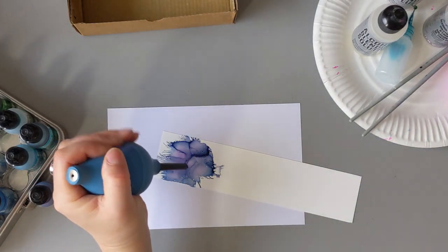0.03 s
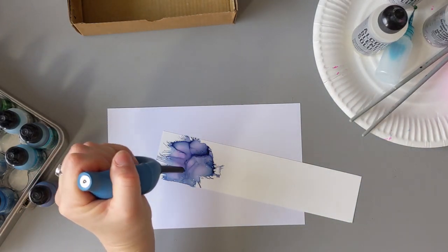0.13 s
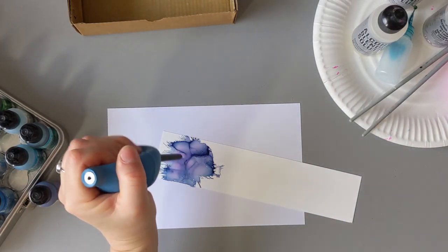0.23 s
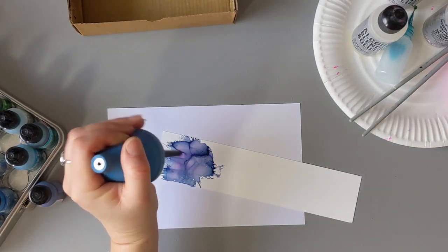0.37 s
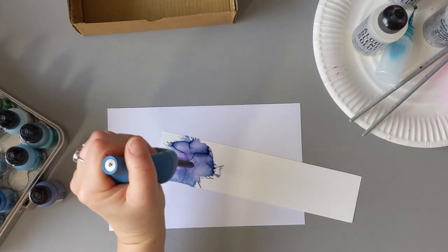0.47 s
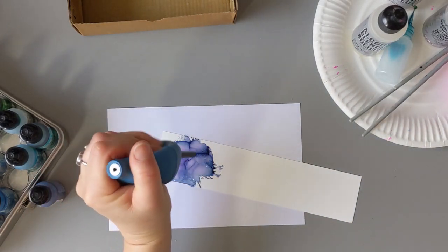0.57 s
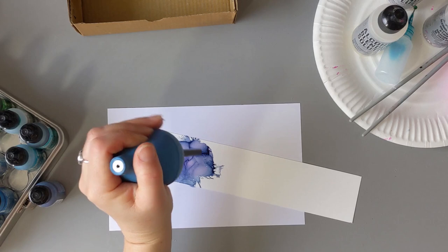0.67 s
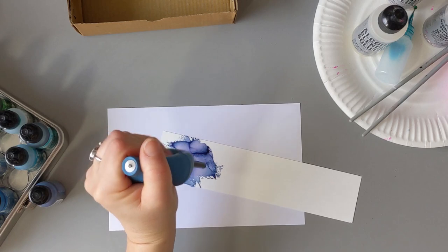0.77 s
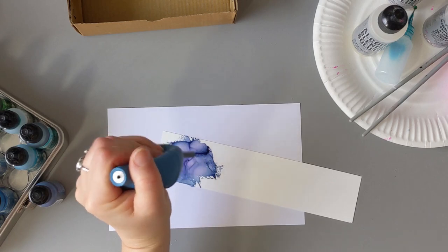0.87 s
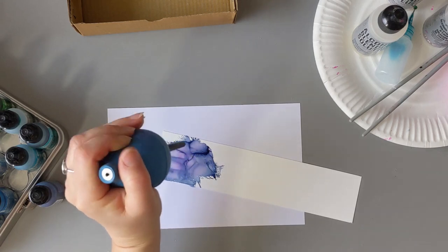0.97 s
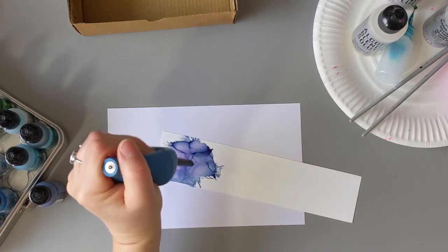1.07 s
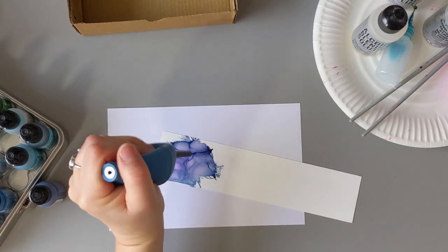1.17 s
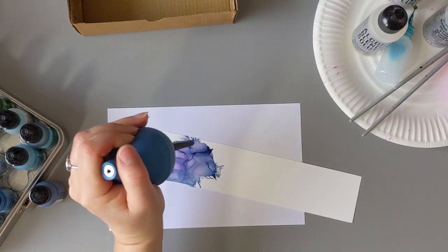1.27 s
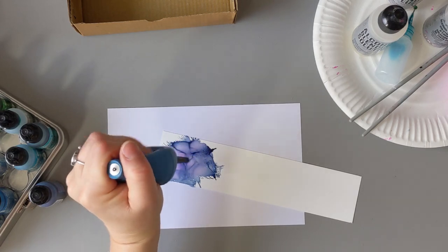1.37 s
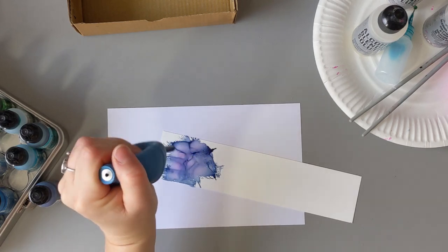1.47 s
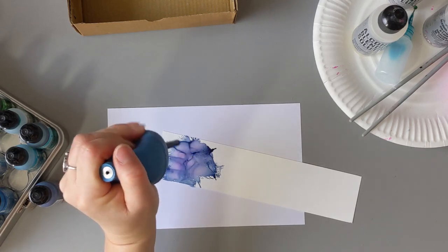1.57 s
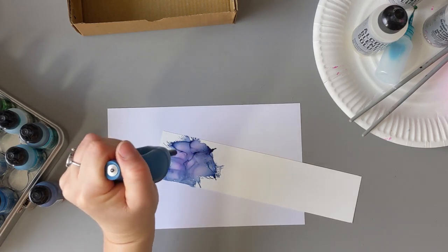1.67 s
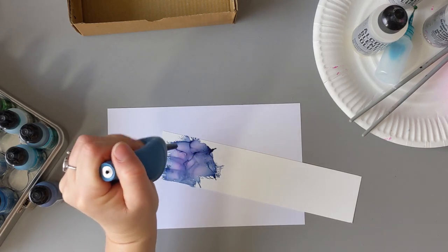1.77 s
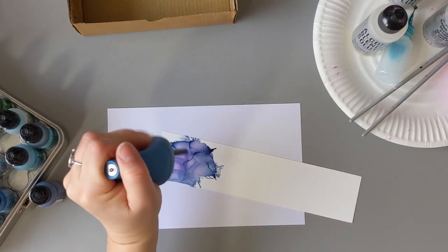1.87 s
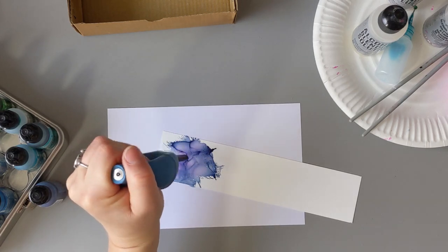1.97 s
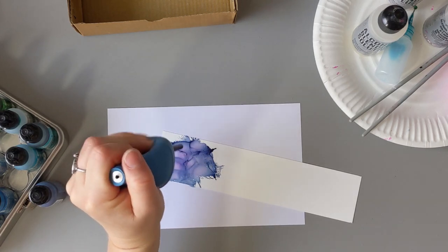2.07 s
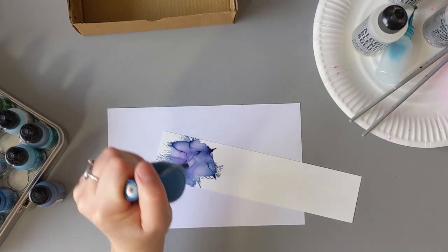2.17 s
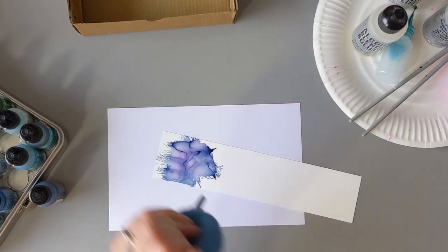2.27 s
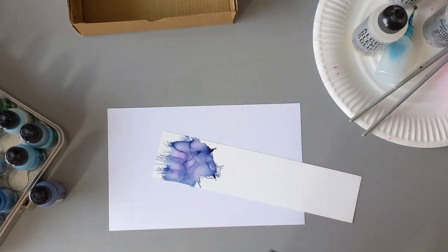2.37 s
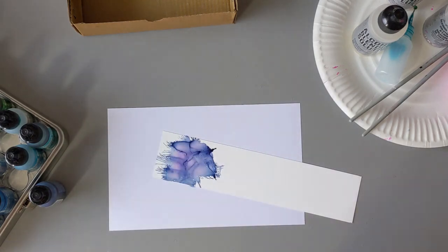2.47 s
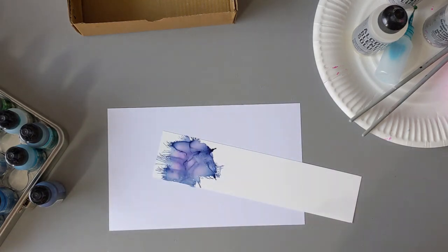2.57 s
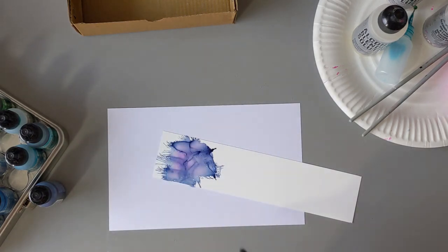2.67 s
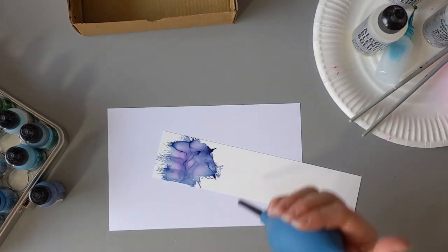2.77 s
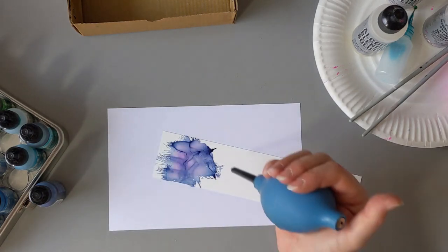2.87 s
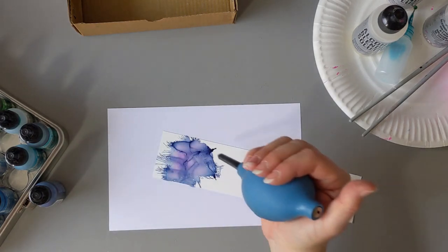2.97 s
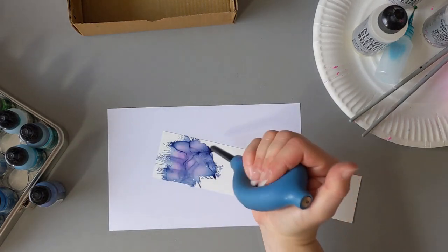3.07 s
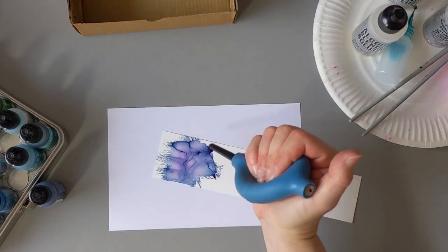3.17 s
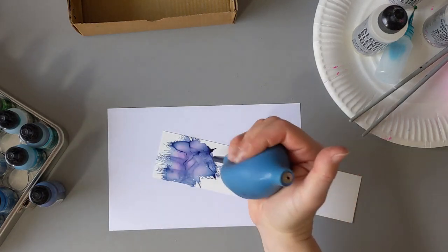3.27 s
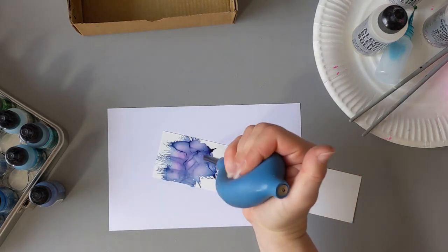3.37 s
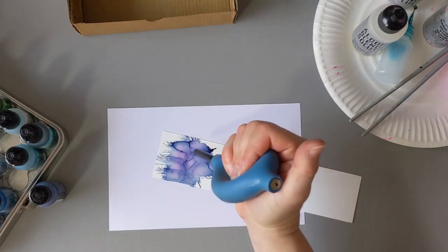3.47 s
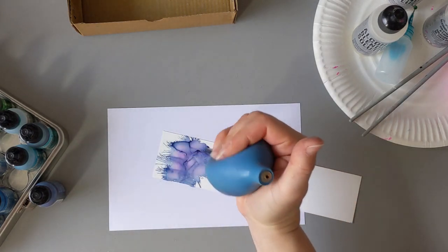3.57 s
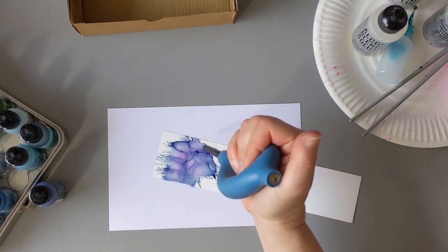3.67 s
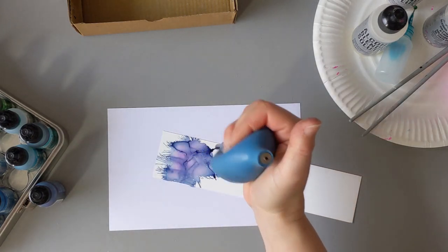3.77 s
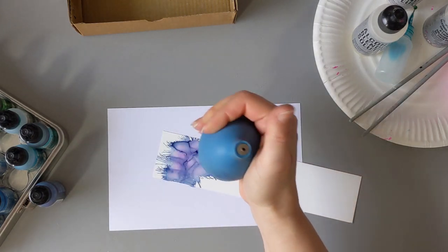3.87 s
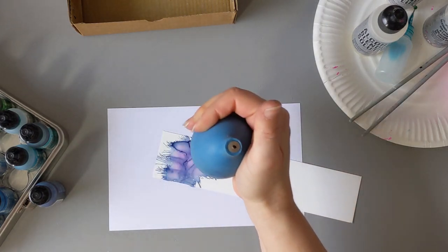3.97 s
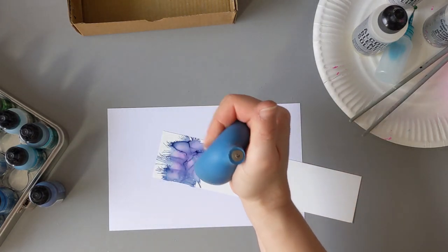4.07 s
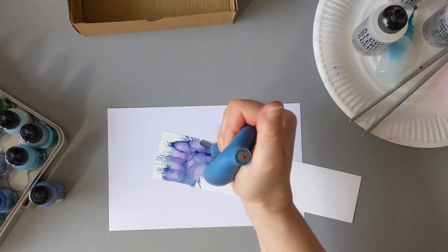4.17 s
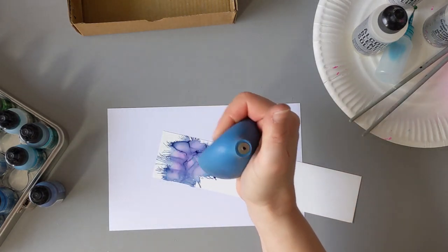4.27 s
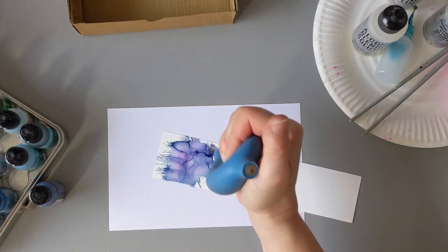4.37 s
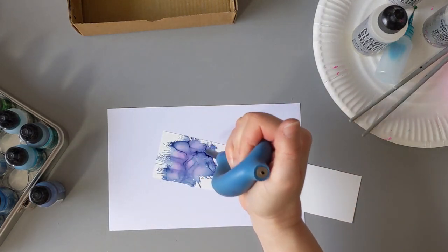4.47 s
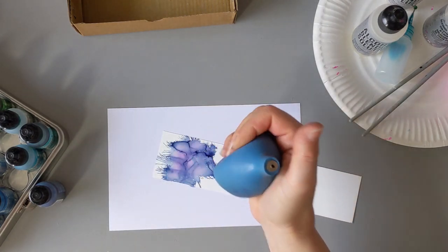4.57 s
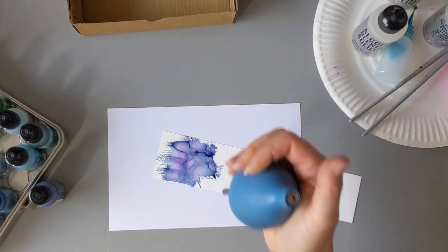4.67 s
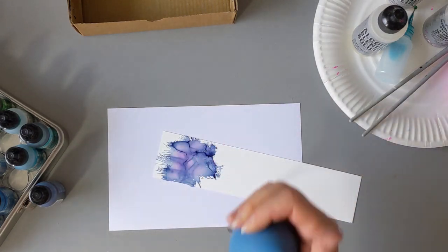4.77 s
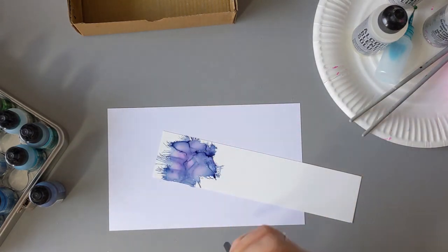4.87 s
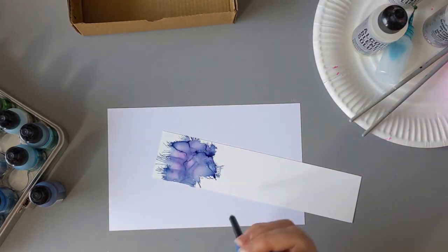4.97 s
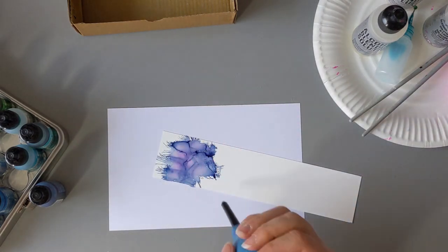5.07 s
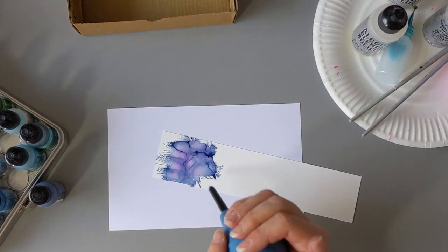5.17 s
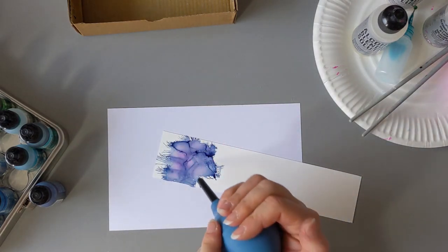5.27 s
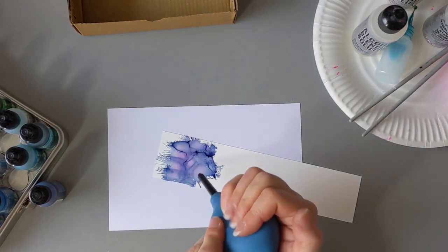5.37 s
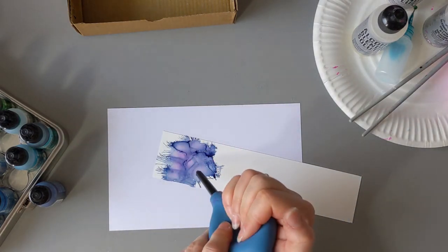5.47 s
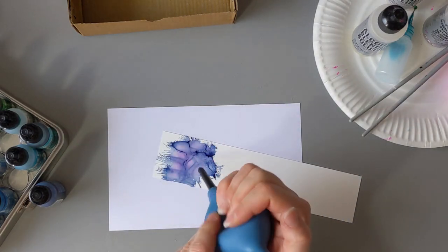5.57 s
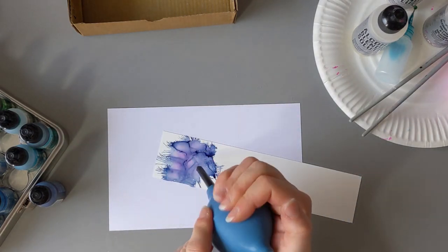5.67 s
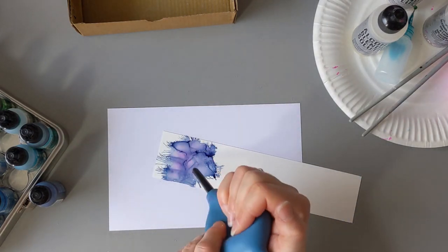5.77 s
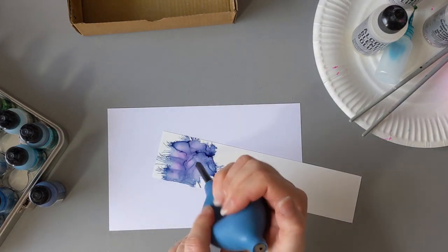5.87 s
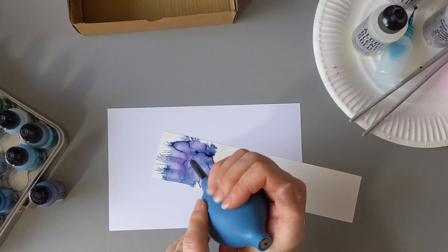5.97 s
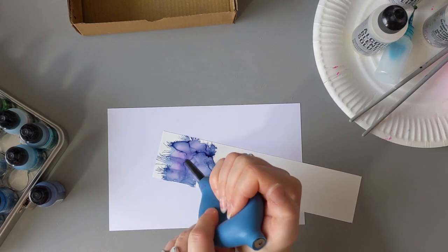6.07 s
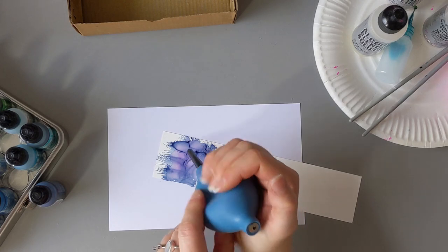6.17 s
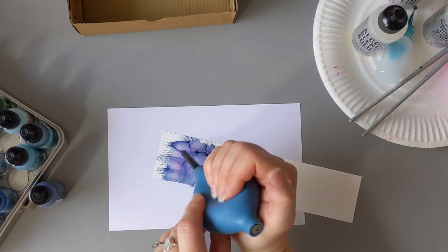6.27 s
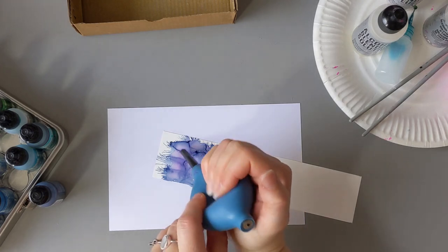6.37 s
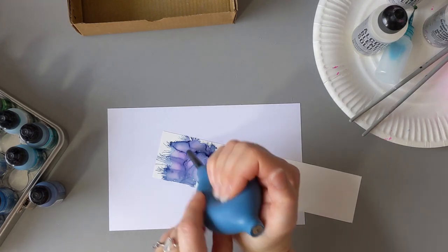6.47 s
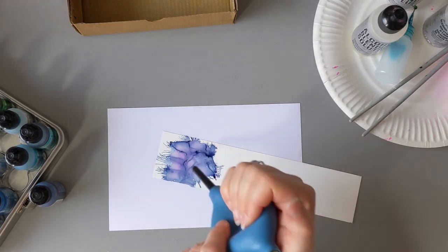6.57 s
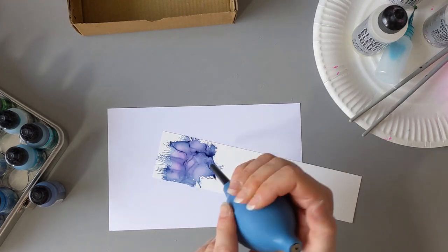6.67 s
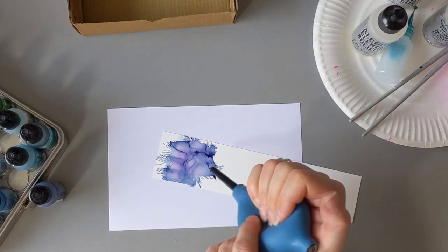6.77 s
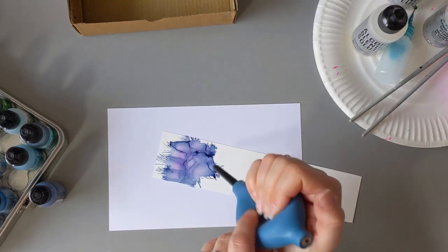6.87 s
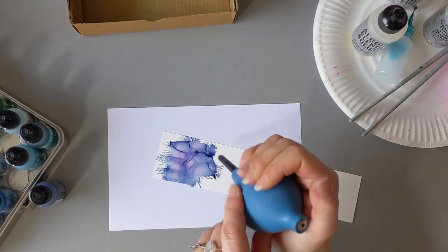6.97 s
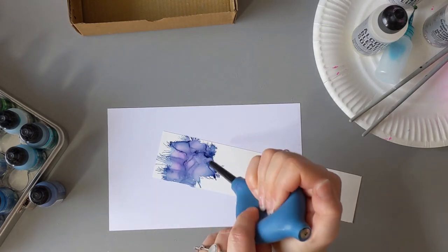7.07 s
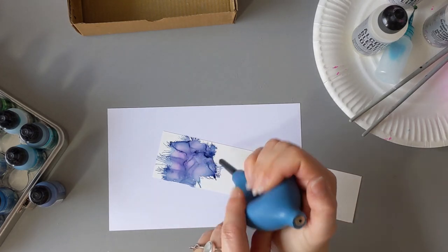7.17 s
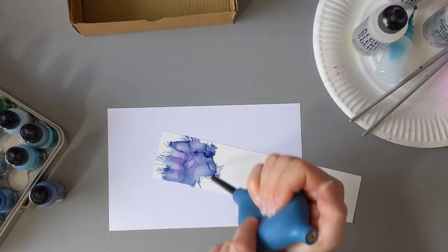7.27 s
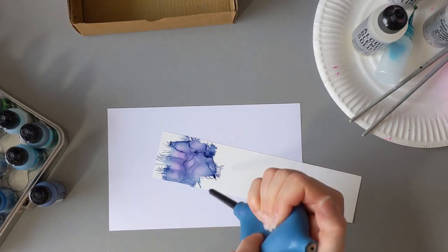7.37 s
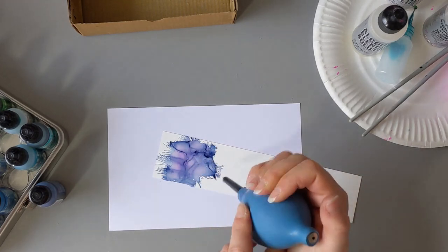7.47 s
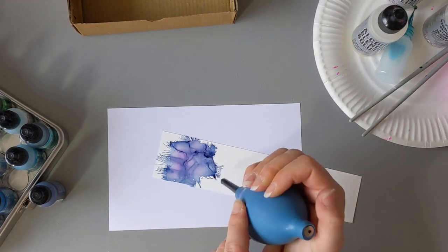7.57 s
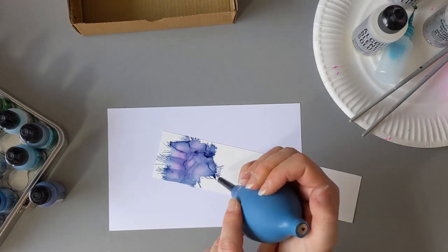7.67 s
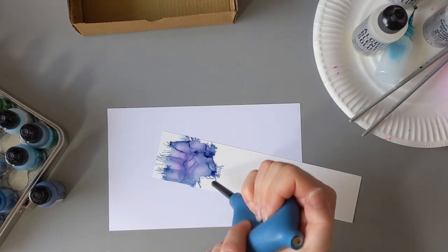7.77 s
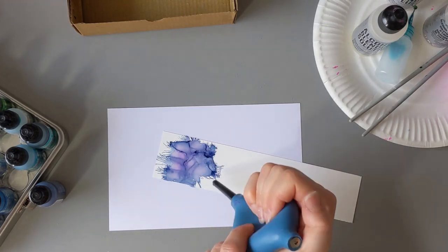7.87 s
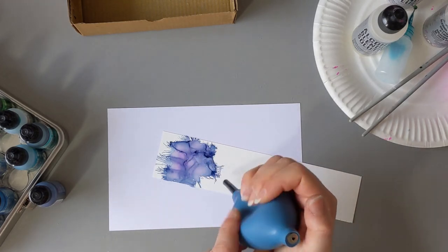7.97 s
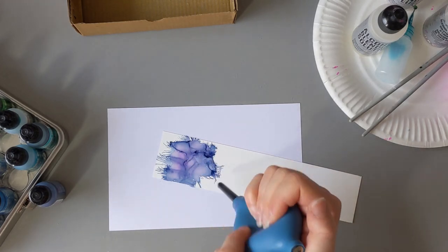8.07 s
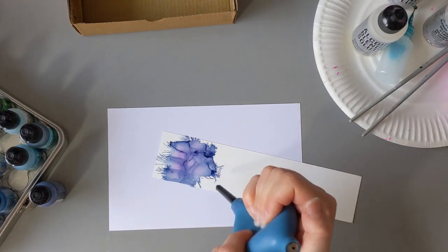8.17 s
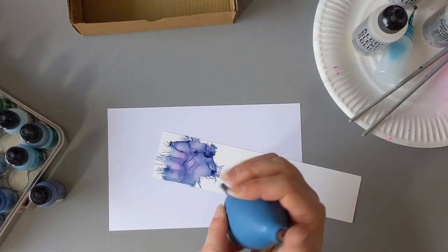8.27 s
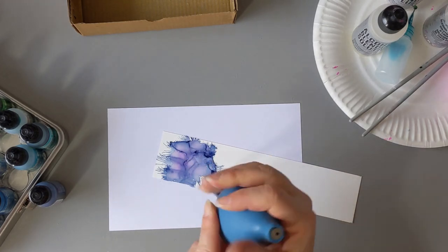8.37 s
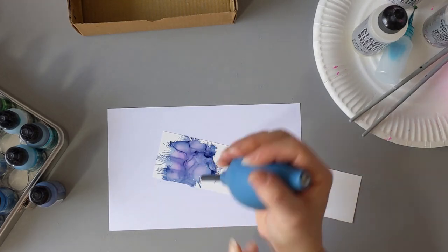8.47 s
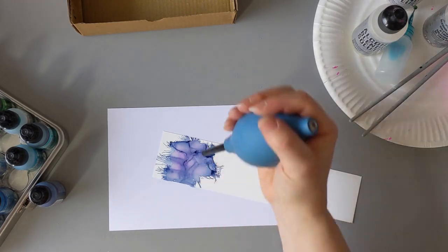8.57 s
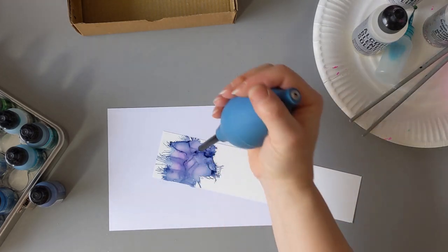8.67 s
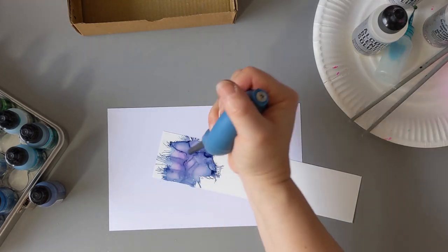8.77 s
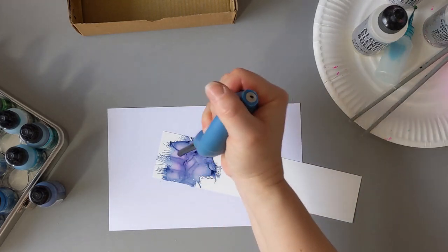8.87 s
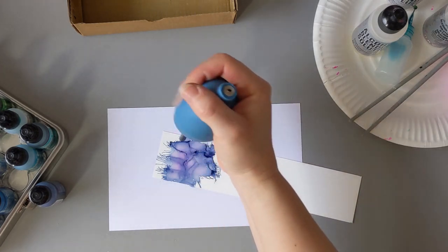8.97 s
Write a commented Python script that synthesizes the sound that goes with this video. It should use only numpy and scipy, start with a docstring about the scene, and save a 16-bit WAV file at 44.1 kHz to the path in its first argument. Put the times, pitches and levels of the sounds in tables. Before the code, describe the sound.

A hand-squeezed rubber blower puffs short, bright bursts of air over paper, about three per second. Between puffs a small valve ticks and air hisses back in. After nine puffs there is a pause with faint skin rubs and a light knock, then more puffs in uneven groups, many ending in a hollow thump. Close stereo microphone, small quiet room with low rumble.

```python
"""Short puffs of air hiss from a rubber bulb blower, first from the left hand, then from the right.
It blows over wet ink on a craft table: each squeeze pushes noisy, swirling air out of the nozzle.
On release the inlet valve ticks open, as a few short ringing tones, and air hisses back in.
Hard squeezes bottom out with a hollow thump, and skin brushes the rubber now and then.
The room is small and quiet: a soft tail of reflections over low rumble and faint hiss."""
import sys
import numpy as np
from scipy import signal
from scipy.fft import rfft, irfft
from scipy.io import wavfile
from scipy.ndimage import uniform_filter1d

SR = 44100
rng = np.random.default_rng(int(sys.argv[2]) if len(sys.argv) > 2 else 0)


def generate_wav(sig):
    """Save sig (samples, or channels by samples) to the path in sys.argv[1] as 16-bit PCM at SR."""
    pcm = np.round(np.clip(np.atleast_2d(sig).T, -1, 1) * 32767).astype(np.int16)
    wavfile.write(sys.argv[1], SR, pcm)


N = 397333  # length in samples

# Settings in pairs are for (left hand, right hand). Levels in tables are starting levels, before the mix.
HAND_CHANGE_S = 2.8
EDGE_HZ = 15900  # upper limit of the sound
USUAL_DB = -40  # starting level of a usual puff or gulp
# how much later the hiss reaches the right channel than the left
LAG_S = (0.000094, 0.00003)

# the hand closes on the bulb: (t/s, length/s, level/dB, swell over the stroke/dB)
SQUEEZES = [(-.061, .08, -43.5, 6), (0.291, 0.13, -46.5, 5), (0.622, 0.13, -44, -0.5),
            (0.929, 0.13, -43, 1), (1.24, 0.12, -41, 0.5), (1.546, 0.097, -39.5, 1),
            (1.823, 0.095, -39.5, 6), (2.097, 0.081, -39.3, 5), (2.33, 0.12, -38.5, -2),
            (3.273, 0.12, -42, 1.5), (3.573, 0.086, -42, -2.5), (3.806, 0.13, -42.5, -3.5),
            (4.298, 0.11, -44.5, -3), (4.556, 0.14, -41, 2.5), (5.612, 0.11, -42, 6.5),
            (5.902, .11, -42.5, 8.5), (6.195, 0.099, -42.5, 2), (6.444, 0.083, -43.5, 6.5),
            (6.667, .1, -40.5, 9), (6.945, .099, -38.5, 9), (7.207, 0.097, -37.5, 5),
            (7.451, .115, -41, 12.5), (7.969, 0.12, -41.5, 8), (8.253, 0.11, -40, 10),
            (8.947, 0.082, -45.5, 9)]
# colour of air leaving the nozzle and striking the paper: (f/Hz, left level/dB, right level/dB)
JET_LEFT_HAND = [(200, -22, -17.5), (816, -13.5, -15), (1510, -22, -21), (1930, -15, -14.5),
                 (2700, -12, -8), (3640, -17.5, -18.5), (5400, -11.5, -9.5), (6300, -4.5, -13.5),
                 (6400, -10.5, -9.5), (8300, -7.5, -13.5), (9900, -14, -6), (10400, -7.5, -7.5),
                 (13100, -13, -4.5), (16400, -15, -8)]
JET_RIGHT_HAND = [(200, -28.5, -28.5), (760, -23, -24), (1680, -27, -28), (2040, -18.5, -19.5),
                  (3120, -14.5, -15.5), (3880, -18.5, -20), (5870, -12.5, -13.5), (5830, -8.5, -14),
                  (7500, -11, -12), (8460, -12, -15.5), (10260, -10.5, -7.5), (11500, -11.5, -9),
                  (13800, -22, -2.5), (14800, -10.5, -5.5)]
LEVEL_AT = 0.65  # share of the stroke at which the swell passes through 0 dB
BUILD_S, RELEASE_S = (0.12, 0.067), (0.0084, 0.0061)  # pressure builds, then collapses
JET_PAN_DB = (1, -0.2)  # extra left minus right level
JET_TILT_DB = (4, 0.84)  # extra brightness per octave at the usual level
JET_BRIGHTENING = 0.29  # faster air is brighter: dB per octave for each dB of level


def nozzle():
    """Pressure builds as the hand closes, and collapses when it stops; harder squeezes are brighter."""
    out = np.zeros((2, N))
    t = np.arange(SR // 4) / SR
    for s, length, db, swell_db in SQUEEZES:
        grip = hand(s)
        build = np.sin(np.pi / 2 * np.clip(t / BUILD_S[grip], 0, 1))
        swell = amp(swell_db * (np.minimum(t / length, 1) - LEVEL_AT))
        collapse = np.exp(-np.maximum(t - length, 0) / RELEASE_S[grip])
        flow = build * swell * collapse
        colour = JET_RIGHT_HAND if grip else JET_LEFT_HAND
        tilt_db = JET_TILT_DB[grip] + JET_BRIGHTENING * (db - USUAL_DB)
        puff = rush(flow, colour, LAG_S[grip], tilt_db, JET_PAN_DB[grip],
                    echo=1.0, sharpening=0.32, flutter_db=0.85)
        add(out, s, amp(db) * puff)
    return out


# the valve lifts and the bulb springs back: (t/s, time to full flow/s, hiss level/dB, tick level/dB)
REFILLS = [(.156, .05, -44.5, -49.5), (.492, 0.056, -42, -51), (.795, 0.057, -41, -51),
           (1.109, 0.053, -39.5, -49.5), (1.41, 0.051, -38, -47.5), (1.686, 0.044, -41, -49.5),
           (1.965, 0.045, -41, -49), (2.21, 0.028, -43, -47), (3.116, 0.076, -40.5, -51),
           (3.434, 0.061, -47, -46.5), (3.69, 0.049, -46.5, -48), (4.141, 0.067, -36.5, -46.5),
           (4.428, 0.052, -39, -44), (5.462, 0.048, -48.5, -56), (5.784, 0.045, -45.5, -49.5),
           (6.081, 0.034, -44, -47.5), (6.334, 0.04, -47.5, -45), (6.551, 0.035, -44, -44),
           (6.815, 0.049, -44, -44.5), (7.085, 0.043, -39, -46), (7.328, 0.04, -35.5, -49),
           (7.816, 0.053, -37.5, -43.5), (8.119, 0.047, -38, -45.5), (8.8, 0.068, -37.5, -48.5)]
# colour of air drawn through the inlet valve: (f/Hz, left level/dB, right level/dB)
INLET_LEFT_HAND = [(200, -17, -11.5), (900, -27, -23.5), (1470, -20.5, -18.5), (2520, -12.5, -8.5),
                   (4370, -5.5, -2), (6060, -8, -6.5), (7600, -11.5, -11), (9850, -5.5, -3),
                   (11600, -6, 2.5), (13900, -17, 1.5), (15900, -2, -2)]
INLET_RIGHT_HAND = [(198, -17, -13), (900, -19.5, -14.5), (1450, -13, -10.5), (2580, -7.5, -3),
                    (4550, -5.5, -2), (6250, -6.5, -4.5), (7550, -9.5, -8.5), (9200, -2.5, -1),
                    (11500, -6, 3), (13600, -6, 3), (16300, -17, 0.5)]
INLET_PAN_DB = (3, 5)  # extra left minus right level
INLET_TILT_DB = (1.76, 2.5)  # extra brightness per octave at the usual level
INLET_BRIGHTENING = 0.33  # dB per octave for each dB of level
LEAK_S = 0.005  # air seeps in this long before the flap lifts
REFILL_FADE_S = 0.019  # at the usual level
SLOWING = 0.087  # a weaker gulp dies away more slowly: dB of fade time for each dB of level


def inlet():
    """The rubber springs back and draws one smooth gulp of air; stronger gulps are brighter."""
    out = np.zeros((2, N))
    t = np.arange(SR // 4) / SR
    for s, to_full, db, _ in REFILLS:
        grip = hand(s)
        rise = LEAK_S + to_full
        fade = REFILL_FADE_S * amp(SLOWING * (USUAL_DB - db))
        width = np.where(t < rise, rise / 2, fade)
        gulp = np.exp(-0.5 * ((t - rise) / width) ** 2)
        flow = gulp * np.minimum(t / 0.00083, 1)  # starts from silence
        colour = INLET_RIGHT_HAND if grip else INLET_LEFT_HAND
        tilt_db = INLET_TILT_DB[grip] + INLET_BRIGHTENING * (db - USUAL_DB)
        hiss = rush(flow, colour, LAG_S[grip], tilt_db, INLET_PAN_DB[grip],
                    echo=0.77, sharpening=0.43, flutter_db=0.9)
        add(out, s - LEAK_S, amp(db) * hiss)
    return out


# how alike moving air sounds in both channels: (f/Hz, left-right likeness 0 to 1)
AIR_LIKENESS = [(200, 1), (1400, 0.5), (4000, 0.36), (15000, 0.099)]


def rush(flow, colour, lag, tilt_db, pan_db, echo, sharpening, flutter_db):
    """Turbulent air through a small opening; its top end grows faster with flow than its body."""
    size = len(flow)
    hz = np.fft.rfftfreq(size, 1 / SR)
    slope_db = tilt_db * np.log2(np.maximum(hz, 2000) / 8000)  # level below 2 kHz stays flat
    late_right = np.exp(-2j * np.pi * hz * np.array([[0], [lag]]))
    gain = amp(read(colour, hz) + slope_db) * late_right
    spectrum = rfft(noise(gain, AIR_LIKENESS, size))
    # the bulb changes shape as air passes, so one pattern of echoes gives way to another
    early, late = (evened(irfft(spectrum * near_echoes(hz, echo), size)) for _ in range(2))
    moved = np.cumsum(flow) / flow.sum()  # share of the air that has passed
    air = early * (1 - moved) + late * moved
    top = irfft(rfft(air) / (1 + (9500 / (hz + 1)) ** 6), size)
    body = air - top
    sharpening = np.clip(sharpening, 0, 0.8)
    sound = body * flow ** (1 - sharpening) + top * flow ** (1 + sharpening / 2)
    eddies = evened(uniform_filter1d(rng.standard_normal(size), size=130))
    return sound * amp(flutter_db * eddies) * amp([[pan_db / 2], [-pan_db / 2]])


def near_echoes(hz, strength, count=6):
    """Hand, bulb and table reflect the hiss a moment later; the delays are drawn anew each time."""
    delay = rng.uniform(0.000334, 0.005, (count, 1))
    delay = delay + 0.000015 * rng.standard_normal((2, count, 1))  # slightly different left and right
    sign = rng.choice([-1, 1], (count, 1))
    echoes = (sign * np.exp(-2j * np.pi * hz * delay)).sum(1)
    return 1 + strength * echoes / np.sqrt(count)


# ringing of the flap and its housing: (f/Hz before the pitch ratio, level/dB, time to fall 60 dB/s)
VALVE_MODES = [(322, 0.5, 0.017), (937, -1.5, 0.015), (1244, -1.5, 0.012), (3130, -11.5, 0.011),
               (7630, 2.5, 0.0071)]
FLAP_PITCH = (0.933, 1.0)  # pitch ratio of the lifting flap
FLAP_SPREAD = 0.2  # each opening tick strays from that pitch by up to this share
SHUT_DB, SHUT_DELAY_S = (-70.5, -64), 0.009  # starting level; wait from squeeze to flap seating


def valve():
    """Suction tugs the flap open with a tick; pressure seats it again, tauter and usually higher."""
    out = np.zeros((2, N))
    for s, _, _, db in REFILLS:
        pitch = FLAP_PITCH[hand(s)] * (1 + FLAP_SPREAD * rng.uniform(-1, 1))
        add(out, s, amp(db + 6.5) * ring(VALVE_MODES, attack=0.0011, pitch=pitch))
        add(out, s, amp(db - 20.0) * spit(decay=0.0071))
        add(out, s, amp(db + 2) * spit(decay=0.0003))  # the flap unsticks with a needle-sharp crack
        add(out, s - 0.004, amp(db + 2.5) * push(width=0.00251))
    for start, *_ in SQUEEZES:
        s = start + SHUT_DELAY_S
        db = SHUT_DB[hand(start)]
        pitch = 1.31 * rng.uniform(0.695, 0.98)
        add(out, s, amp(db + 8.0) * ring(VALVE_MODES, attack=0.0001, pitch=pitch))
        add(out, s, amp(db + 4) * spit(decay=0.011))
    return out


def spit(decay):
    """A tiny burst of air slips past the moving flap."""
    t = np.arange(SR // 25) / SR
    colour = amp(read(INLET_RIGHT_HAND, np.fft.rfftfreq(len(t), 1 / SR)))
    return noise(colour, AIR_LIKENESS, len(t)) * np.exp(-t / decay)


# a hard squeeze bottoms out: (t/s, hollow ring level/dB, dull push level/dB)
THUMPS = [(.009, -58, -66), (3.932, -79, -55), (4.688, -53, -48.5), (5.706, -50.5, -49),
          (6.003, -35.5, -49), (6.292, -26, -64), (6.537, -58, -60), (6.762, -34, -51), (7.039, -36.5, -50),
          (7.301, -41, -54), (7.56, -36, -57), (8.08, -48.5, -50), (8.349, -58, -50.5)]
# air in the bulb and its rubber wall: (f/Hz before the pitch ratio, level/dB, time to fall 60 dB/s)
BULB_MODES = [(528, 5.5, 0.036), (340, 6, 0.0036), (338, -13.5, 0.11), (560, -29, 0.13)]
# fingers knock the bulb as it changes hands: (t/s, level/dB)
KNOCKS = [(2.561, -53.5)]
# ringing of the knocked bulb: (f/Hz, level/dB, time to fall 60 dB/s)
KNOCK_MODES = [(497, 1.5, 0.077), (539, -10, 0.32), (907, -5, 0.061)]
# the rubber wall flops back into shape: starting level, and start as a multiple of time to full flow
FLOP_DB, FLOP_AFTER = (-59, -49.5), 1.5


def bulb():
    """The walls meet after a hard squeeze and the hollow rings; flops and a knock come in between."""
    out = np.zeros((2, N))
    for s, ring_db, push_db in THUMPS:
        hollow = ring(BULB_MODES, attack=0.0014, pitch=rng.uniform(1.0, 1.03), slack=0.0015)
        add(out, s - 0.002, -amp(ring_db + 3.5) * hollow)
        add(out, s - 0.001, amp(push_db + 13) * push(width=0.0019))
        add(out, s - 0.005, amp(push_db + 5) * push(width=0.0051))
    for s, to_full, *_ in REFILLS:  # no ring: the hollow is open again
        add(out, s + FLOP_AFTER * to_full, amp(FLOP_DB[hand(s)]) * push(width=0.00073))
    for s, db in KNOCKS:
        add(out, s, amp(db) * ring(KNOCK_MODES, attack=0.001))
    return out


def ring(modes, attack, pitch=1, slack=0):
    """Fading tones after a soft blow; slack rubber starts low and tightens within milliseconds."""
    t = np.arange(SR // 5) / SR
    bent_time = pitch * (t - slack * (1 - np.exp(-t / 0.0016)))
    tones = sum(amp(db - 60 * t / t60) * np.sin(2 * np.pi * hz * bent_time) for hz, db, t60 in modes)
    return tones * (1 - np.exp(-t / attack))


def push(width):
    """A brief dip and rebound of air pressure as the rubber wall moves."""
    u = np.arange(SR // 20) / SR / width - 2
    return u * np.exp(-u ** 2)


# skin brushing the rubber: (t/s, length/s, level/dB)
RUBS = [(2.556, 0.017, -63.5), (2.567, 0.15, -70), (2.726, 0.017, -63), (2.74, 0.021, -65),
        (2.809, 0.24, -70), (4.996, 0.027, -61), (5.004, 0.072, -72), (8.549, 0.16, -76)]
# colour of the brushing: (f/Hz, level/dB)
RUB_COLOUR = [(200, -22), (1000, -2), (4000, 0.5), (7500, -5.5), (11000, -1.5), (16000, -5)]


def fingers():
    """Short brushes of skin on rubber: noise with a grainy, uneven loudness."""
    out = np.zeros((2, N))
    for s, length, db in RUBS:
        size = int(length * SR) + 2
        colour = amp(read(RUB_COLOUR, np.fft.rfftfreq(size, 1 / SR)))
        hiss = noise(colour, AIR_LIKENESS, size)
        grain = amp(1.4 * evened(uniform_filter1d(rng.standard_normal(size), size=60)))
        add(out, s, amp(db) * evened(hiss * grain) * signal.windows.tukey(size, 0.7))
    return out


# how long the room rings: (f/Hz, time to fall 60 dB/s)
ROOM_DECAY = [(100, 0.21), (320, 0.11), (550, 0.2), (2000, 0.27), (7000, 0.22), (15000, 0.19)]


def room(x, gap):
    """Dense reflections of a small room, each band dying at its own speed."""
    hz, t, z = signal.stft(rng.standard_normal((2, SR // 2)), SR, nperseg=256)
    fading = z * amp(-60 * t / read(ROOM_DECAY, hz).T)
    tail = signal.istft(fading, SR, nperseg=256)[1]
    # silent for one gap, then fades in over the next
    tail *= np.clip(np.arange(tail.shape[1]) / SR / gap - 1, 0, 1)
    tail = tail / np.linalg.norm(tail, axis=1, keepdims=True)
    return signal.fftconvolve(x, tail, axes=1)[:, :N]


# colour of the quiet room: (f/Hz, relative level per Hz/dB)
HUSH = [(20, -3), (48, 2), (72, -8.5), (100, -1.5), (155, -15.5), (215, -12.5), (400, -19.5), (520, -15.5),
        (900, -21.5), (4500, -26), (7500, -33.5), (11000, -30), (15500, -34)]
# how alike the quiet is in both channels: (f/Hz, left-right likeness 0 to 1)
HUSH_LIKENESS = [(50, 0.92), (250, 0.78), (700, 0.088), (1500, 0), (16000, 0.054)]
HUSH_DB = -65.5


def hush():
    """Steady low rumble and faint hiss, made of coloured noise."""
    colour = amp(read(HUSH, np.fft.rfftfreq(N, 1 / SR)))
    return amp(HUSH_DB) * noise(colour, HUSH_LIKENESS, N)


def hand(s):
    """Which hand holds the bulb at time s: 0 left, 1 right."""
    return int(s >= HAND_CHANGE_S)


def noise(gain, likeness, size):
    """Stereo noise of average strength (rms) 1, with a gain and left-right likeness per frequency."""
    hz = np.fft.rfftfreq(size, 1 / SR)
    a, b = rfft(rng.standard_normal((2, size)))
    same = np.clip(read(likeness, hz)[0], -1, 1)
    right = same * a + np.sqrt(1 - same ** 2) * b
    return evened(irfft(np.array([a, right]) * gain * (hz < EDGE_HZ), size))


def read(points, hz):
    """Each value column of a table, joined by straight lines on a log-frequency axis."""
    f, *columns = np.transpose(points)
    return np.array([np.interp(np.log(hz + 1), np.log(f + 1), c) for c in columns])


def amp(db):
    """Turns decibels into gain."""
    return 10 ** (np.asarray(db) / 20)


def evened(x):
    """Scales a sound to average strength (rms) 1."""
    return x / np.sqrt(np.mean(x ** 2) + 1e-20)


def add(mix, s, sound):
    """Lays a mono or stereo sound into the mix at time s, cutting what falls outside."""
    start = round(s * SR)
    sound = sound[..., max(-start, 0):]
    part = mix[:, max(start, 0):][:, :sound.shape[-1]]
    part += sound[..., :part.shape[1]]


def scene():
    """The blower close to the microphone, with the room behind it."""
    air = amp(3.5) * nozzle() + amp(0.48) * inlet() + fingers()
    knocks = valve() + bulb()
    air_tail = amp(-10.0) * room(air, gap=0.0021)
    boom = room(knocks, gap=0.00077)
    boom = boom + 0.54 * boom[::-1]  # both sides share part of the boom
    near_knocks = knocks * amp([[0.4], [-0.4]])  # slightly to the left
    return air + air_tail + near_knocks + amp(-8) * boom + hush()


def record(dry):
    """The microphone drops the deepest rumble; then a steep filter cuts the highest treble."""
    rumble_cut = signal.butter(4, 28, "highpass", fs=SR, output="sos")
    thinned = signal.sosfilt(rumble_cut, dry)
    band_limit = signal.firwin(511, EDGE_HZ, window=("kaiser", 9), fs=SR)
    return signal.oaconvolve(thinned, band_limit[None], "same")


dry = scene()
out = record(dry)
generate_wav(out)
```